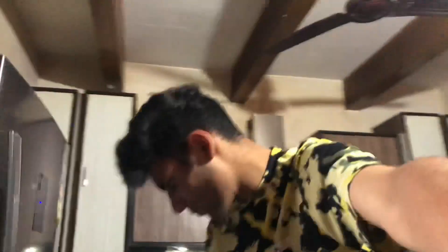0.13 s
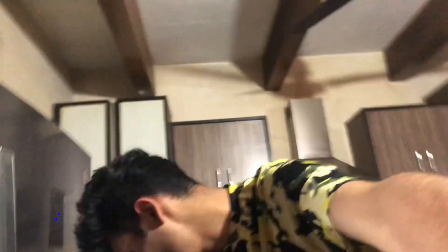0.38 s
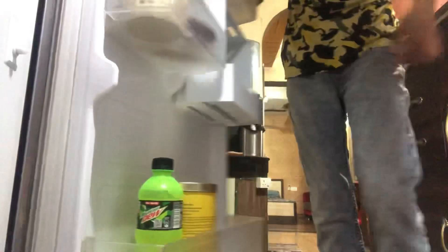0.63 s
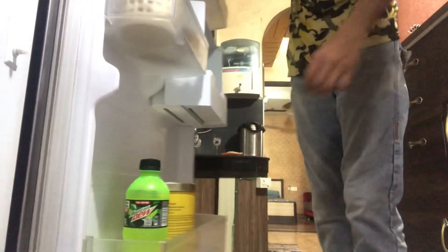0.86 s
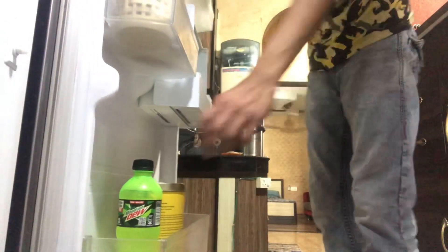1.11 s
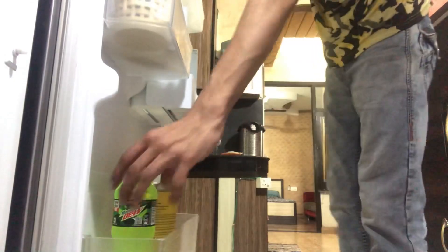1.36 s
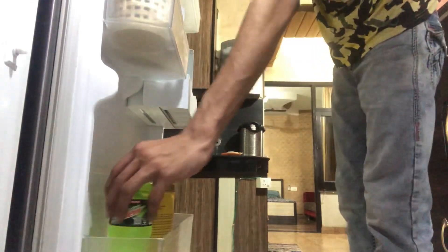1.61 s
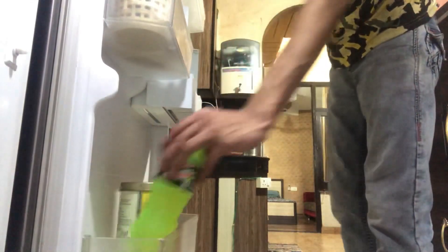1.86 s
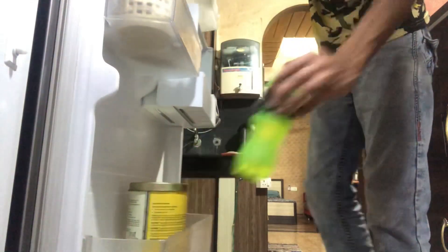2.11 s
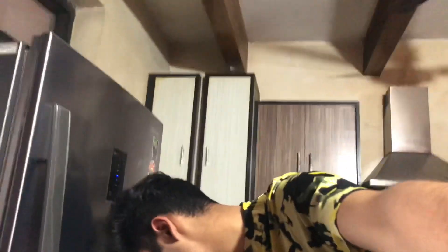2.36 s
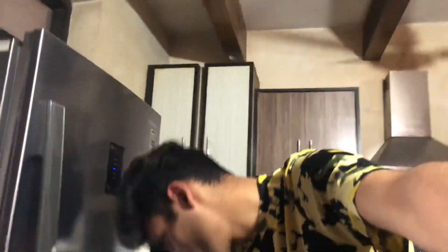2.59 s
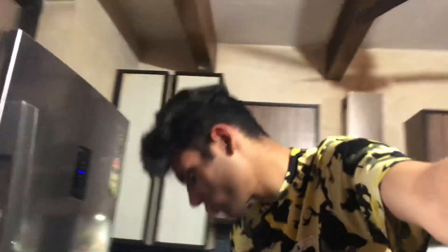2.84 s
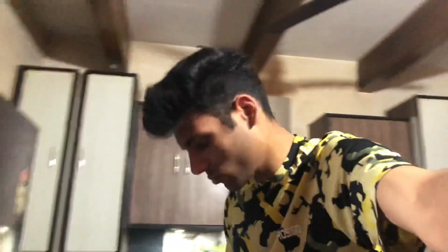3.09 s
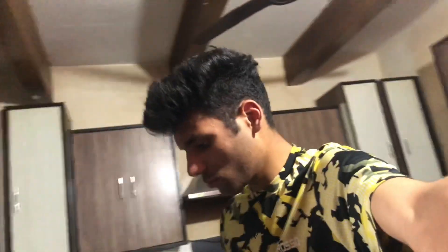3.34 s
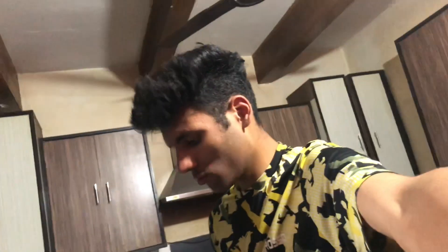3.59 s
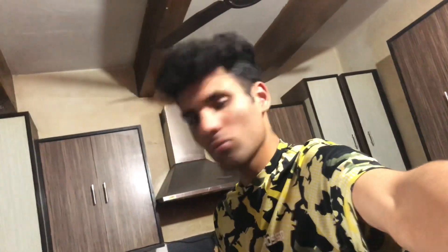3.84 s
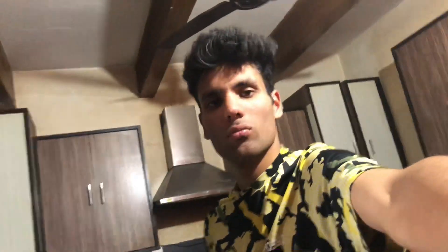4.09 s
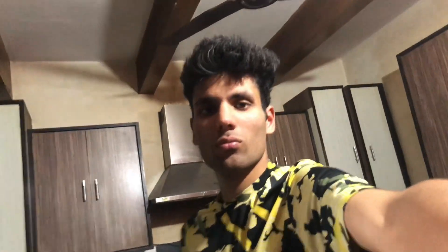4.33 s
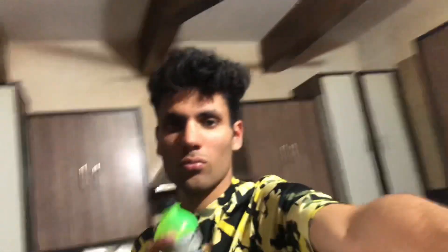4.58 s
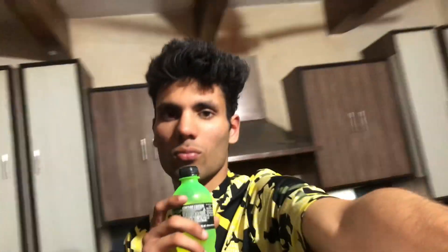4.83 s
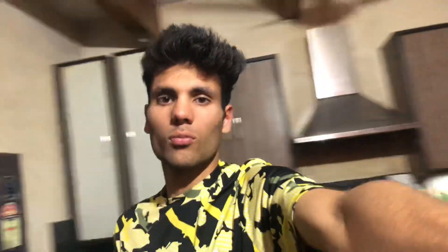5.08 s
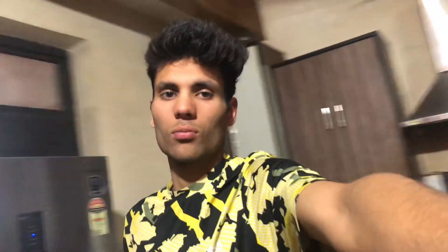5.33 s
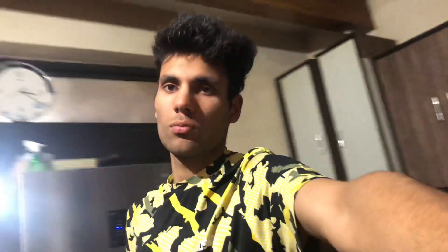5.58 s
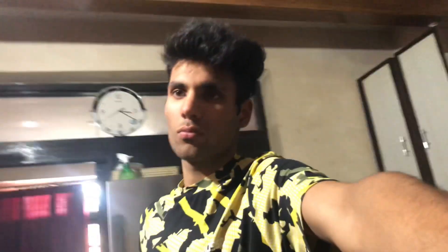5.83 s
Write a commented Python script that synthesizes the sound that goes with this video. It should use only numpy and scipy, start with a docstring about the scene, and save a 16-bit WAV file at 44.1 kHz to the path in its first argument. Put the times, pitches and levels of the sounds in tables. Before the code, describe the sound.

A soft scuff starts at 0 s in a reflective home kitchen, over low rumble, room air and faint hiss. At 0.5 s the sound cuts to a microphone on a refrigerator shelf, with a low wavering compressor hum. Light knocks and rustles come at 0.6-0.9 s, faint brushing at 1.0-1.6 s, small bumps near 1.6 s, then a loud, hard clatter of hollow plastic bottle and shelf at 1.86-2.0 s, with a slight jar ring. At 2.15 s it cuts back to the kitchen, tails chopped off. Soft scuffs come at 2.2-2.4 s, then one faint one at 3.16 s. A sharp metal latch click with a brief buzz hits at 3.5 s, crisp handle knocks at 3.65-3.7 s, a lighter door's shuddering thud at 3.9 s, small knocks and a padded bump by 4.3 s. A heavy door slams at 4.9 s, booming and echoing. A hollow tap at 5.2 s and soft microphone finger bumps follow until 5.6 s, then quiet air with a faint airy tone.

```python
"""First comes a soft scuff in a hard-walled kitchen, over rumble, room air and hiss, all made of shaped noise.
Then the microphone lies on a refrigerator shelf: wavering tones make the compressor hum, and bursts of rough
contact make the shelf, a bottle and a jar ring. Back in the kitchen, latch, handle and doors knock and slam in
the same way, with noise echoes. Clothes rustle as treble hiss; fingers bump the hand-held microphone as short
deep waves, and a faint airy tone is noise in a narrow band."""
import sys
import numpy as np
from scipy import signal
from scipy.io import wavfile
from scipy.ndimage import uniform_filter1d

SR = 44100
rng = np.random.default_rng(int(sys.argv[2]) if len(sys.argv) > 2 else 0)


def generate_wav(signal):
    """Clip the signal to [-1, 1] and save it as 16-bit WAV at the path in sys.argv[1]."""
    frames = np.transpose(np.atleast_2d(signal))
    scaled = np.clip(frames, -1, 1) * 32767
    pcm = np.round(scaled).astype(np.int16)
    wavfile.write(sys.argv[1], SR, pcm)


def boost(x):
    """Linear amplitude factor 10**(x/20) for a level x in decibels (scalar or array-like)."""
    u = np.asarray(x, float) / 20
    return 10 ** u


N = 262174   # length in samples
SHELF_FROM_S, SHELF_TO_S = .506, 2.153   # the scene jumps into the refrigerator and back
EDGES_HZ = 25 * 2 ** np.arange(0, 9.6, .5)   # half-octave band edges

# Noise colours, relative levels only: pitch_hz, level_db
RUMBLE_COLOUR = [(15, -55), (25, -7), (35, -39), (54, 7.5), (97, -9), (145, -2), (300, -24), (390, -43),
                 (660, -120)]
AIR_COLOUR = [(120, -46.5), (200, 2.5), (300, 6.5), (340, 0), (449, -1.5), (519, 1), (2000, -16.5),
              (2600, -36), (4400, -120)]
RUSTLE_COLOUR = [(710, -8.5), (1200, 12.5), (1520, -30.5), (1890, -1.5), (2350, -4.5), (4550, -2),
                 (10800, -12), (14400, -34), (16000, -39)]
# Steady background in each place: rumble_db, air_db
KITCHEN_LEVELS = (-59, -62.5)
SHELF_LEVELS = (-56.5, -60.5)
# Treble hiss, swelling and sinking with movements near the microphone: time_s, level_db
HISS_LEVEL = [(0, -60), (0.3, -64), (0.498, -56.5), (0.51, -71), (0.67, -68), (0.69, -54), (0.75, -50.5),
              (0.799, -54), (0.84, -65.5), (0.999, -64), (1.4, -57), (1.64, -69.5), (2.163, -71),
              (2.172, -57), (2.45, -65), (3.03, -69), (3.45, -63), (3.68, -65), (3.77, -65), (3.85, -72.5),
              (4.4, -68.5), (4.55, -63), (4.719, -70.5), (5.35, -66), (5.94, -70)]

# All blow tables: start_s, thud_peak_db, knock_peak_db, crack_peak_db, rattle_t60_s
# (t60 is the time to die away by 60 dB)
SCUFF_BLOWS = [(0.0014, -39, -35, -41.5, 0.23), (2.225, -40, -60, -68, 0.089),
               (2.283, -51, -37, -65, 0.046), (2.321, -54, -37, -65, 0.058),
               (2.393, -37, -34.5, -58, 0.099), (3.1584, -44.5, -53, -55, 0.15),
               (4.7355, -37, -48, -40.5, 0.22), (4.821, -44, -33, -36, 0.44)]   # soft pushes and scuffs against the doors
SHELF_BLOWS = [(0.5977, -59, -43.5, -67, 0.086), (0.6778, -38.5, -41, -40, 0.14),
               (0.737, -57, -27.5, -57, 0.018), (0.8183, -37, -41.5, -64, 0.087),
               (0.8649, -37.5, -44.5, -36.5, 0.031), (1.565, -38.5, -37.5, -66.5, 0.28),
               (1.607, -34, -31, -72, 0.062), (1.63, -29, -47, -70, 0.057),
               (1.8625, -19, -15.5, -25.5, 0.18), (1.8875, -16, -17.5, -25, 0.079),
               (1.9056, -16, -13.5, -15, 0.054), (1.9382, -29, -19.5, -27.5, 0.078),
               (1.9595, -18.5, -22, -50, 0.085)]   # knocks on the refrigerator shelf
KITCHEN_BLOWS = [(2.277, -40, -43, -49.5, 0.087), (2.3034, -66, -39, -60, 0.049),
                 (2.3402, -42, -53, -45.5, 0.055), (2.386, -54, -40, -53, 0.046),
                 (3.8995, -26, -35.5, -40, 0.58), (3.9378, -34, -19, -22.5, 0.14),
                 (4.115, -40, -33, -35, 0.1), (4.152, -51, -46, -42, 0.048),
                 (4.189, -53, -37.5, -33.5, 0.088), (4.735, -51, -55, -45, 0.055),
                 (4.82, -53, -50, -47, 0.04), (4.8734, -40, -33, -31.5, 0.033),
                 (4.8845, -41, -26.5, -16.5, 0.062), (4.8909, -19.5, -25, -15.5, 0.038),
                 (4.897, -26, -21, -25, 0.059), (4.928, -25, -14.5, -24, 0.057),
                 (5.0, -49, -36, -31, 0.022), (5.056, -35, -48, -33.5, 0.07)]   # sharper knocks and slams of the doors
HANDLE_BLOWS = [(3.6462, -40, -35, -42, 0.015), (3.6595, -52, -44, -52, 0.03),
                (3.6782, -44, -31, -39, 0.025), (3.697, -46, -47, -60, 0.06)]   # crisp knocks of a handle
LIGHT_TOUCH_BLOWS = [(3.906, -24, -37, -39, 0.041)]   # first touch of the lighter door
LIGHT_SHUDDER_BLOWS = [(3.921, -25, -22, -23, 0.22)]   # its shudder
THUMP_BLOWS = [(4.28, -40, -36.5, -65, 0.13)]   # a padded bump after the lighter door
HEAVY_SHUDDER_BLOWS = [(4.888, -25.5, -17.5, -22, 0.22)]   # the whole heavy door shudders as it shuts
TAP_BLOWS = [(5.2075, -46, -41, -46, 0.07)]   # a small hollow knock after the slam

# What each struck thing rings with, relative levels only: pitch_hz, level_db, t60_s
DOOR_THUD_MODES = [(69.2, 1, 0.26), (148, -0.5, 0.11), (192, 3, 0.028), (262.3, -8.5, 0.25)]
DOOR_KNOCK_MODES = [(383, 2.5, 0.012), (457, -4.5, 0.0068), (663, -4.5, 0.017), (893, 2.5, 0.01),
                    (1100, -2.5, 0.012), (1350, -6, 0.023), (1570, -12, 0.029), (1940, -36, 0.024)]
SOFT_KNOCK_MODES = [(300, 9.5, 0.037), (398, 11.5, 0.023), (597, 11, 0.013), (836, 1.5, 0.045),
                    (1050, -5, 0.0079), (1600, -25, 0.02)]   # a soft contact wakes mostly the low modes
SHELF_THUD_MODES = [(89, -3.5, 0.65), (129, 2, 0.067), (226, -2, 0.02)]
SHELF_KNOCK_MODES = [(324.4, 4.5, 0.053), (464, 6.5, 0.012), (587, 3.5, 0.046), (878, 4, 0.029),
                     (1250, -1, 0.013), (1570, -11, 0.054)]
BOTTLE_RING = [(923, -5, 0.045), (970, -2.5, .04)]
JAR_RING = [(2800, -3, .03), (3800, 0, .05), (7200, -3, .015)]
LATCH_RING = [(1700, -12, .002), (2500, -3, .003), (3200, 0, .003), (4200, -3, .0025), (5200, -7, .002),
              (8000, -10, .002)]
HANDLE_THUD_MODES = [(172, -9, .08), (304, 4, 0.048)]
HANDLE_KNOCK_MODES = [(470, -2, 0.017), (850, 0, .02), (1200, -1.5, .012), (1530, 0, 0.016),
                      (1980, -2, 0.014)]
LIGHT_THUD_MODES = [(61, 4, 0.087), (140.3, -2, 0.3), (202, -0.5, 0.044)]
THUMP_KNOCK_MODES = [(294, -2.5, 0.037), (403, -1, 0.031), (693, -9, .02)]
TAP_KNOCK_MODES = [(860, -2, 0.04), (1190, 0, 0.04), (1300, -3, 0.03)]

# How long echoes last in the kitchen and in the cabinet: pitch_hz, t60_s
KITCHEN_ECHO = [(60, 0.1), (160, 0.82), (420, 0.61), (1100, 0.7), (2910, 0.58), (7680, 0.58)]
CABINET_ECHO = [(60, 0.75), (300, 0.75), (1200, 0.54), (4000, 0.53), (12000, 0.2)]

# Faint airy tone: start_s, end_s, level_db, width_hz
WHISTLE_TIMES = [(.1, .5, -68, 170), (5.25, 5.9, -71, 380)]
# Compressor tones, about which they waver: pitch_hz, level_db
HUM_TONES = [(107.7, -56), (188.4, -54.5), (296.1, -67)]
# Hits on the hollow bottle, and a jolt to the jar beside it: start_s, peak_db
BOTTLE_HITS = [(0.682, -43), (1.611, -32), (1.865, -14), (1.875, -15), (1.909, -15.5), (1.914, -14),
               (1.955, -26.5), (2.006, -47)]
JAR_HITS = [(1.908, -40)]
# Brushing on the shelf: start_s, end_s, fade_s, level_db, low_hz, high_hz
SCRAPES = [(0.715, 0.82, .02, -58, 2150, 3100), (1.0, 1.6, .3, -63, 3700, 5200)]
# Metal clicks of the latch: start_s, peak_db, pitch_factor, contact_t60_s
LATCH_CLICKS = [(3.4965, -22, .95, .005), (3.5035, -35, 1.7, .006), (3.6692, -39, 1.75, .025)]
# Loose parts buzz after the first click: start_s, peak_db, t60_s
LATCH_BUZZ = (3.498, -38.5, 0.24)
# The heavy door's panel swings at its lowest mode: start_s, peak_db, pitch_hz, swell_s, t60_s
PANEL_BOOM = (4.893, -21, 63, .06, .2)
# Fingers on the microphone body: middle_s, peak_db, pitch_hz
FINGER_BUMPS = [(5.248, -30, 76.4), (5.297, -39, 70), (5.325, -39.5, 70.4), (5.37, -37.5, 129),
                (5.438, -41, 70), (5.476, -39.5, 119), (5.497, -31, 245), (5.516, -38, 102),
                (5.566, -39, 129)]


def rms_one(x):
    """Scales a sound to an average (rms) strength of 1."""
    return x / np.sqrt(np.mean(x ** 2) + 1e-20)


def peak_one(x):
    """Scales a sound so its highest peak is 1."""
    return x / np.max(np.abs(x))


def at_hz(points, hz):
    """Reads a table between its points, with pitch on a log scale."""
    pitches, values = np.transpose(points)
    return np.interp(np.log(hz), np.log(pitches), values)


def band(x, low_hz, high_hz):
    """Keeps the sound between two pitches."""
    return signal.sosfilt(signal.butter(2, [low_hz, high_hz], "band", fs=SR, output="sos"), x)


def drift(rate_hz):
    """Slow random wandering around 0, with rms 1; made at every 40th sample and joined by lines."""
    r = np.exp(-80 * np.pi * rate_hz / SR)
    white = rng.standard_normal(N // 40 + 2002)
    slow = signal.lfilter([1], [1, -2 * r, r * r], white)[2000:]   # skip the filter's start
    return np.interp(np.arange(N) / 40, np.arange(len(slow)), rms_one(slow))


def coloured(spectrum, patchy_db, rate_hz):
    """Half-octave noise bands, each flickering partly with the others and partly alone; rms 1."""
    out, white, together = 0, rng.standard_normal((2, N)), drift(rate_hz)
    for k, (low, high) in enumerate(zip(EDGES_HZ, EDGES_HZ[1:])):
        middle_hz = np.sqrt(low * high)
        if spectrum[0][0] / 1.3 < middle_hz < spectrum[-1][0] * 1.3:
            flicker_db = patchy_db * (.7 * together + drift(rate_hz))
            gain = boost(at_hz(spectrum, middle_hz) + flicker_db)
            out = out + gain * band(white[k % 2], low, high)
    return rms_one(out)


def background(inside):
    """Noise as rumble and room air, louder on the shelf, under a changing treble hiss."""
    rumble_db, air_db = [kitchen + inside * (shelf - kitchen)
                         for kitchen, shelf in zip(KITCHEN_LEVELS, SHELF_LEVELS)]
    hiss_db = np.interp(np.arange(N) / SR, *np.transpose(HISS_LEVEL))
    rumble = boost(rumble_db) * coloured(RUMBLE_COLOUR, patchy_db=1.5, rate_hz=23.0)
    air = boost(air_db) * coloured(AIR_COLOUR, patchy_db=2.0, rate_hz=40.0)
    hiss = boost(hiss_db) * coloured(RUSTLE_COLOUR, patchy_db=1.3, rate_hz=21.0)
    # on the shelf the hiss has more of its highest treble
    top = rms_one(band(rng.standard_normal(N), 11000, 16000))
    return rumble + air + hiss + inside * boost(hiss_db - 19) * top


def ring(force, hz, t60):
    """A force sets one dying sine ringing; a unit click gives it height 1."""
    r, w = boost(-60 / (max(t60, .001) * SR)), 2 * np.pi * hz / SR
    return signal.lfilter([0, np.sin(w)], [1, -2 * r * np.cos(w), r * r], force)


def body(force, modes):
    """Every mode (a pitch the thing rings at) answers the force at the strength its table gives."""
    return sum(boost(level_db) * peak_one(ring(force, hz, t60)) for hz, level_db, t60 in modes)


def blows(events, thud_modes, knock_modes, grain_db, rise_s, strike, sizzle_db,
          top_hz=11500, low_hz=1760, high_hz=5470, count=30):
    """Each blow is a dying rattle of uneven contacts: it rings the body, cracks, and sizzles above."""
    out, size = np.zeros(N + SR), SR // 2
    t = np.arange(size) / SR
    for s, thud_db, knock_db, crack_db, t60 in events:
        # contacts clump together over count samples
        clumps = rms_one(uniform_filter1d(rng.standard_normal(size), size=count))
        grains = rng.standard_normal(size) * boost(grain_db * clumps)
        grains[12] += strike * np.std(grains)   # one early contact gets an extra push
        force = grains * boost(-60 * t / max(t60, .004)) * (1 - np.exp(-t / rise_s)) + 1e-18
        crack = band(band(force, low_hz, 8800), low_hz, high_hz)
        sizzle = band(force, 5970, top_hz)
        # below a hard crack of -12 dB, the sizzle weakens faster than the crack
        top_db = crack_db + sizzle_db + 0.3 * (crack_db + 12)
        at = round(s * SR)
        for layer, level_db in ((body(force, thud_modes), thud_db), (body(force, knock_modes), knock_db),
                                (crack, crack_db), (sizzle, top_db)):
            out[at:at + size] += boost(level_db) * peak_one(layer)
    return out[:N]


def scuffs():
    """Soft, clumpy contacts against the doors wake mostly low modes."""
    return blows(SCUFF_BLOWS, DOOR_THUD_MODES, SOFT_KNOCK_MODES, 3.2, rise_s=0.003, strike=0,
                 sizzle_db=-12.0, low_hz=900, high_hz=2300, count=250)


def reverberate(x, t60s, rise_s):
    """Dense echoes: noise that swells as the reflections arrive and dies band by band."""
    t = np.arange(SR) / SR
    white, tail = rng.standard_normal((2, SR)), 0
    for k, (low, high) in enumerate(zip(EDGES_HZ, EDGES_HZ[1:])):
        fade = boost(-60 * t / at_hz(t60s, np.sqrt(low * high)))
        tail = tail + band(white[k % 2], low, high) * fade
    tail = tail * (1 - np.exp(-t / rise_s))
    return signal.fftconvolve(x, tail / np.sqrt(np.sum(tail ** 2)))[:N]


def whistle():
    """Noise squeezed twice through a narrow band, fading in and out."""
    out, t = 0, np.arange(N) / SR
    pitch_hz, fade_s = 1920, .12
    for start, end, level_db, width_hz in WHISTLE_TIMES:
        edges = pitch_hz - width_hz / 2, pitch_hz + width_hz / 2
        gain = boost(level_db) * np.clip(np.minimum(t - start, end - t) / fade_s, 0, 1)
        out = out + gain * rms_one(band(band(rng.standard_normal(N), *edges), *edges))
    return out


def compressor():
    """Steady tones that waver a little in pitch and strength."""
    out = 0
    for hz, level_db in HUM_TONES:
        strength = np.sqrt(2) * boost(level_db + 0.79 * drift(29.0))   # root 2 turns rms into height
        pitch = hz * (1 + 0.0045 * drift(1.63))
        out = out + strength * np.sin(2 * np.pi * np.cumsum(pitch) / SR)
    return out


def shelf_knocks():
    """Hard contacts ring the refrigerator shelf."""
    return blows(SHELF_BLOWS, SHELF_THUD_MODES, SHELF_KNOCK_MODES, 3.3, rise_s=0.00022, strike=5.0,
                 sizzle_db=1.5, top_hz=14500)


def hollow_ring(hits, modes, low_hz, high_hz, contact_t60):
    """A dying, rough contact pumps up the modes of a hollow wall."""
    out, t = np.zeros(N + SR), np.arange(SR // 4) / SR
    for s, peak_db in hits:
        force = rng.standard_normal(len(t)) * boost(-60 * t / contact_t60)
        sound = peak_one(band(body(force, modes), low_hz, high_hz))
        out[round(s * SR):][:len(t)] += boost(peak_db) * sound
    return out[:N]


def bottle():
    """A short rough contact rings the bottle's low modes."""
    return hollow_ring(BOTTLE_HITS, BOTTLE_RING, 360, 1380, contact_t60=.03)


def scrape():
    """Uneven slips, crowded into one band."""
    out, t = 0, np.arange(N) / SR
    for start, end, fade_s, level_db, low_hz, high_hz in SCRAPES:
        slips = rng.standard_normal(N) * boost(3.0 * drift(60.0))
        gain = boost(level_db) * np.clip(np.minimum(t - start, end - t) / fade_s, 0, 1)
        out = out + gain * rms_one(band(slips, low_hz, high_hz))
    return out


def jar():
    """A longer rough contact rings the jar's high modes."""
    return hollow_ring(JAR_HITS, JAR_RING, 2000, 9000, contact_t60=.5)


def door_knocks():
    """Quick, hard contacts ring the doors."""
    return blows(KITCHEN_BLOWS, DOOR_THUD_MODES, DOOR_KNOCK_MODES, 4.06, rise_s=0.00053, strike=3.0,
                 sizzle_db=-2.5)


def latch():
    """Small metal parts ring for a few milliseconds; the first click leaves a bright buzz."""
    out, t = np.zeros(N + SR), np.arange(SR // 2) / SR
    for s, peak_db, pitch, t60 in LATCH_CLICKS:
        force = rng.standard_normal(len(t)) * boost(-60 * t / t60)
        force[0] = 5   # a hard first contact
        modes = [(min(hz * pitch, 12000), level_db, ring_t60) for hz, level_db, ring_t60 in LATCH_RING]
        click = peak_one(band(body(force, modes), 1300, 10000))
        out[round(s * SR):][:len(t)] += boost(peak_db) * click
    s, peak_db, t60 = LATCH_BUZZ
    buzz = band(rng.standard_normal(len(t)) * boost(-60 * t / t60), 2200, 6000)
    out[round(s * SR):][:len(t)] += boost(peak_db) * peak_one(buzz)
    return out[:N]


def handle():
    """Crisp contacts with a strong first strike ring the handle."""
    return blows(HANDLE_BLOWS, HANDLE_THUD_MODES, HANDLE_KNOCK_MODES, 3.0, rise_s=0.0003, strike=8.0,
                 sizzle_db=-14.0, low_hz=1200, high_hz=4500)


def light_door():
    """A soft first touch, then a slowly swelling shudder of the lighter door."""
    touch = blows(LIGHT_TOUCH_BLOWS, LIGHT_THUD_MODES, SOFT_KNOCK_MODES, 3.7, rise_s=0.004, strike=0,
                  sizzle_db=-11.0)
    shudder = blows(LIGHT_SHUDDER_BLOWS, LIGHT_THUD_MODES, DOOR_KNOCK_MODES, 4.0, rise_s=0.04, strike=0,
                    sizzle_db=-14.0, low_hz=1200, high_hz=4000, count=250)
    return touch + shudder


def thump():
    """A padded bump: the contact swells gently and has little treble."""
    return blows(THUMP_BLOWS, LIGHT_THUD_MODES, THUMP_KNOCK_MODES, 3.0, rise_s=0.012, strike=0,
                 sizzle_db=-12.0)


def heavy_shudder():
    """The whole heavy door rattles as it shuts, swelling before it dies."""
    return blows(HEAVY_SHUDDER_BLOWS, DOOR_THUD_MODES, DOOR_KNOCK_MODES, 4.8, rise_s=0.027, strike=0,
                 sizzle_db=-0.5, low_hz=1320, high_hz=3970, count=250)


def boom():
    """One deep mode of the heavy door swells and dies."""
    s, peak_db, hz, swell_s, t60 = PANEL_BOOM
    t = np.maximum(np.arange(N) / SR - s, 0)
    envelope = (1 - np.exp(-t / swell_s)) * boost(-60 * t / t60)
    return boost(peak_db) * peak_one(envelope * np.sin(2 * np.pi * hz * t))


def tap():
    """A small, even contact makes a hollow knock with a bright sizzle."""
    return blows(TAP_BLOWS, DOOR_THUD_MODES, TAP_KNOCK_MODES, 1.8, rise_s=0.0015, strike=3.0, sizzle_db=7.5)


def bumps():
    """A finger tap shakes the microphone for about two soft cycles."""
    out, t = np.zeros(N), np.arange(N) / SR
    for s, peak_db, hz in FINGER_BUMPS:
        cycles = (t - s) * hz
        out += boost(peak_db) * np.exp(-(cycles / 0.5) ** 2) * np.cos(2 * np.pi * cycles)
    return out


def scene():
    """Shelf and kitchen each have their own blows and echo; the jumps between them cut every tail."""
    t = np.arange(N) / SR
    # 1 on the shelf, 0 in the kitchen, with 1.6 ms ramps
    inside = np.clip(np.minimum(t - SHELF_FROM_S, SHELF_TO_S - t) / 0.0016, 0, 1)

    knocks = shelf_knocks()
    cabinet_echo = boost(-11.0) * reverberate(band(knocks, 135, 15000), CABINET_ECHO, rise_s=0.0009)
    shelf = knocks + cabinet_echo + compressor() + scrape() + bottle() + jar()

    doors = scuffs() + door_knocks() + light_door() + thump() + heavy_shudder() + boom()
    clicks = latch() + handle() + tap()
    # latch, handle and tap are near and wake the room less than the doors
    into_room = band(doors + boost(-9) * clicks, 127, 8700)
    kitchen_echo = boost(-3.0) * reverberate(into_room, KITCHEN_ECHO, rise_s=0.00084)
    kitchen = doors + clicks + kitchen_echo

    places = inside * shelf + (1 - inside) * kitchen
    return (places + bumps() + background(inside) + whistle())[None]   # one channel


def top_cut(x):
    """Nothing passes above the cut-off."""
    return signal.sosfilt(signal.butter(12, 16440, fs=SR, output="sos"), x)


def record(dry):
    """The microphone drops the deepest bass, rounds the highest peaks and the top is cut."""
    no_deep_bass = signal.sosfilt(signal.butter(6, 48, "high", fs=SR, output="sos"), dry)
    rounded = .55 * np.tanh(no_deep_bass / .55)
    mix = signal.sosfilt(signal.cheby2(12, 60, 16300, fs=SR, output="sos"), rounded)
    return top_cut(mix)


dry = scene()
out = record(dry)
generate_wav(out)
```